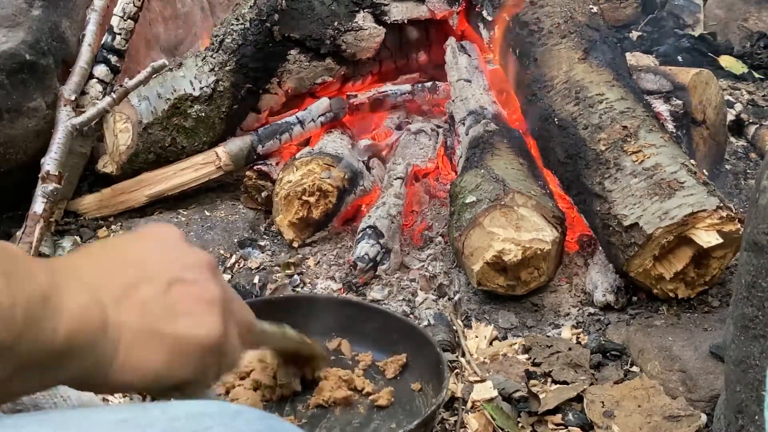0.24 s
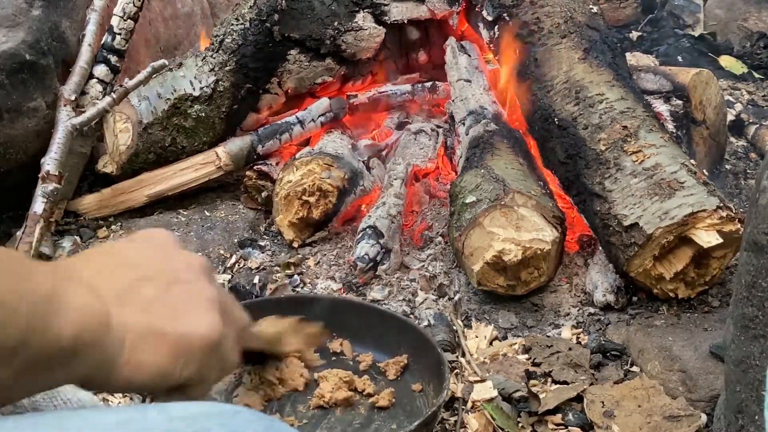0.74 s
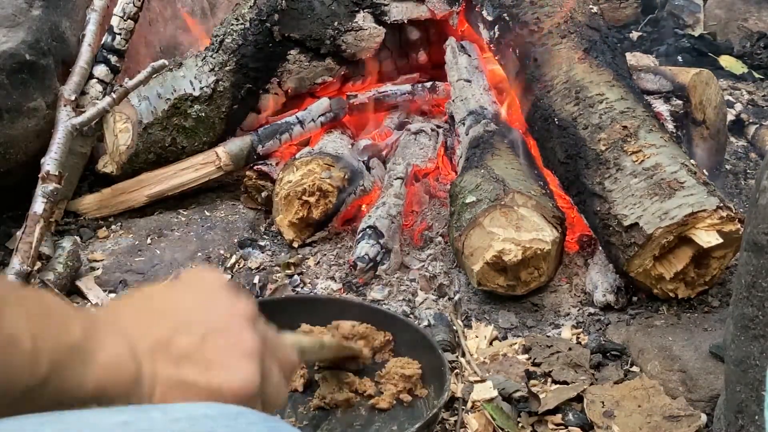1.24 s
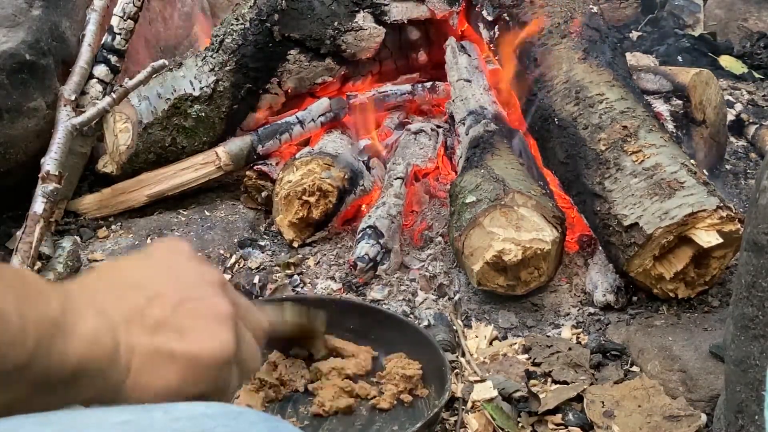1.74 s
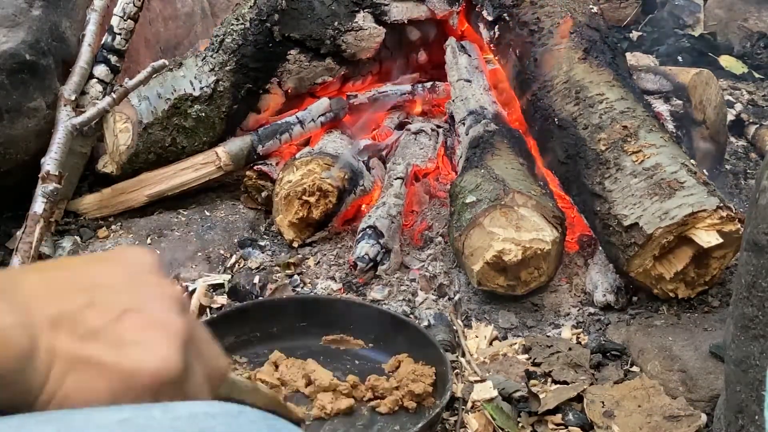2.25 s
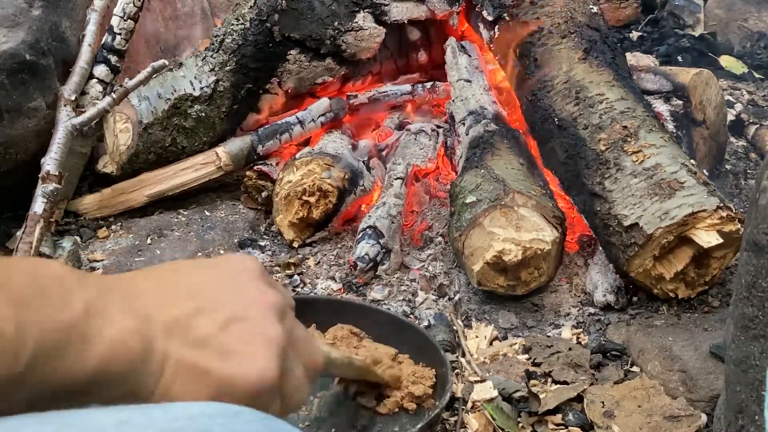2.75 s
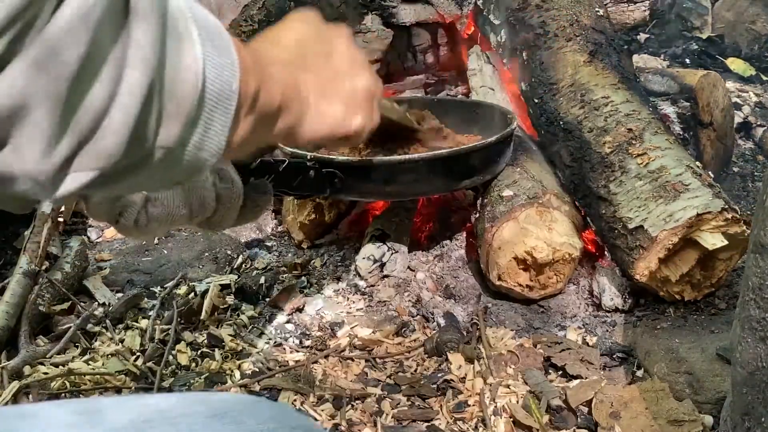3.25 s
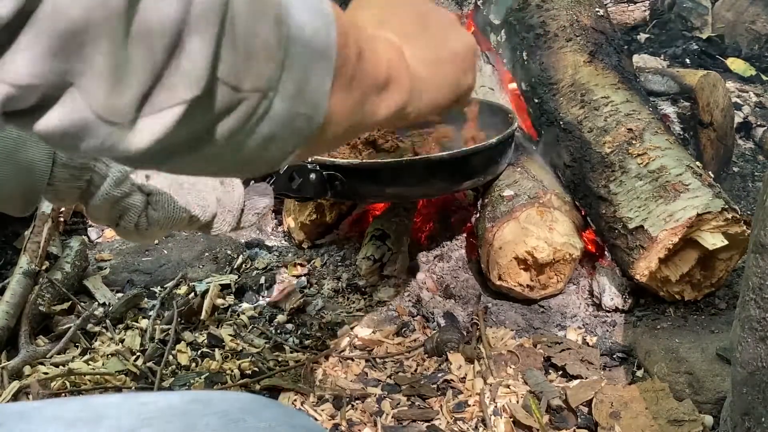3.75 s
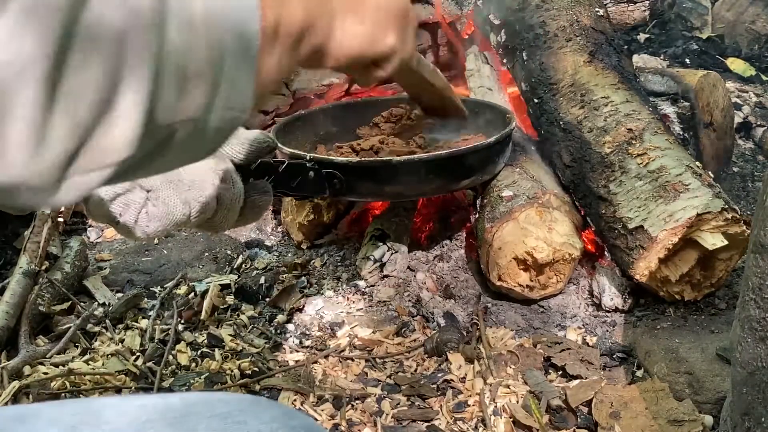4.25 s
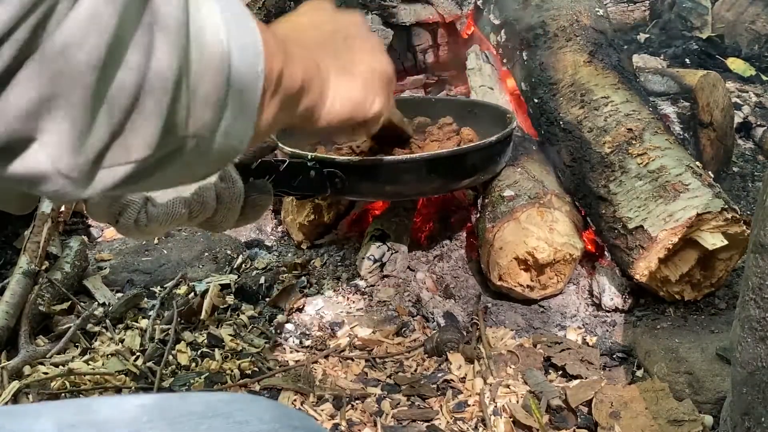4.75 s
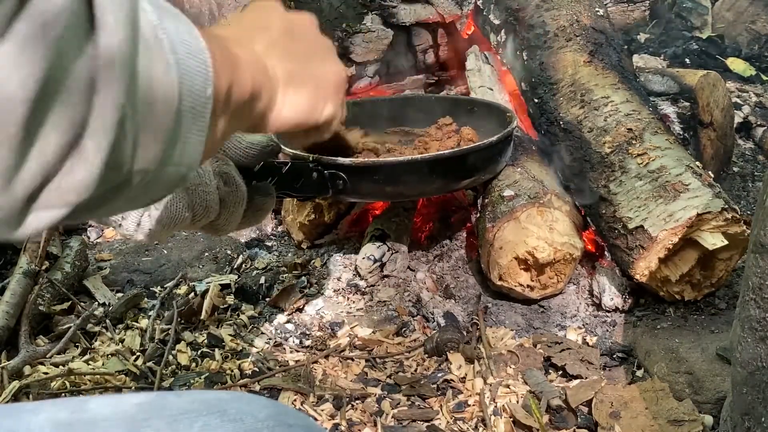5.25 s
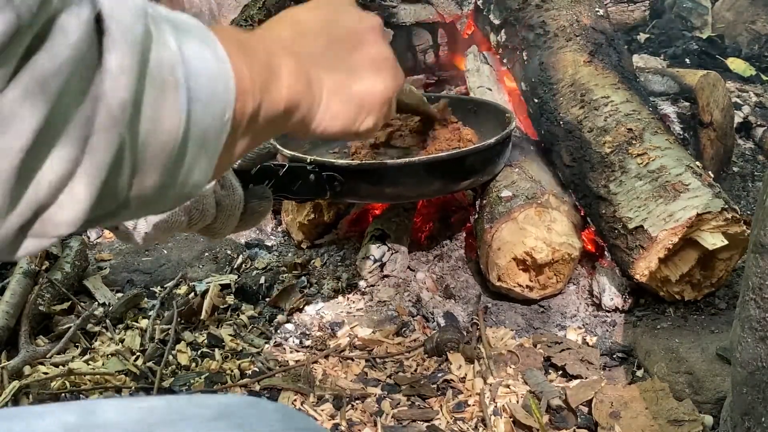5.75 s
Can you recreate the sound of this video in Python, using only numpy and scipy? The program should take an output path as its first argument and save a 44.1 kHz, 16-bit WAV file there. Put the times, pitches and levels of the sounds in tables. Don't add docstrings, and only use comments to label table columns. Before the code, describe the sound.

Wood taps and rubs on a small iron pan: sparse, short, hollow knocks, some with a hard clacking edge, each followed by a brief hiss or rasp and a squeaky low song of metal. Halfway through the pan is lifted, its tone shifts, and firm knocks follow every third of a second or so. Near microphone, open air, dry, with a quiet fire and woods far below.

```python
import sys
import numpy as np
from scipy import signal
from scipy.fft import rfft, irfft, next_fast_len
from scipy.io import wavfile

SR = 44100
rng = np.random.default_rng(int(sys.argv[2]) if len(sys.argv) > 2 else 0)


def unload_audio(sound):
    columns = np.transpose(np.atleast_2d(sound))
    steps = np.round(np.clip(columns, -1, 1) * 32767)
    wavfile.write(sys.argv[1], SR, steps.astype(np.int16))


def nominal_scale(level):
    x = np.asarray(level, float) / 20
    return 10 ** x


N = 265261
LIFT_S = 3.14

# start in seconds, body level in dB, body mode in Hz, low-mode level in dB, low mode in Hz.
KNOCKS_RESTING = [(0.174, -29, 806, -52, 514), (0.41, -28, 558, -58, 540), (0.4128, -33, 1150, -29.5, 273),
                  (0.73, -47, 1280, -26, 338), (0.726, -37, 594, -66, 506), (0.742, -58, 1040, -32, 270),
                  (0.761, -42, 594, -42, 352), (0.782, -45.5, 744, -45, 265), (0.827, -55, 1640, -70, 300),
                  (0.844, -47, 1210, -54.5, 286), (1.058, -39, 1050, -24, 300),
                  (1.603, -39, 1064, -33.5, 432), (1.864, -27, 796, -27, 592), (1.916, -44, 541, -54, 517),
                  (2.331, -36, 587, -59, 466), (2.718, -21, 845, -36, 493), (2.723, -19, 1230, -22.5, 478)]
# start in seconds, body level in dB, body mode in Hz, low-mode level in dB, thud level in dB.
KNOCKS_HELD = [(3.348, -36.5, 620, -56.5, -64), (3.353, -38, 603, -59, -38), (3.394, -37, 600, -39, -77),
               (3.593, -42.5, 720, -57, -33), (3.607, -48, 654, -44, -36), (3.626, -60, 500, -60, -36),
               (3.651, -45.5, 503, -40, -56), (4.0135, -26.5, 690, -47.5, -26), (4.021, -27, 760, -27, -27),
               (4.123, -80, 505, -49, -60), (4.161, -65, 520, -52, -66), (4.191, -73, 493, -55, -64),
               (4.415, -20.5, 660, -26.5, -64), (4.421, -25.5, 666, -23.5, -24.5),
               (4.722, -33, 642, -45, -53), (4.859, -51, 530, -36, -73), (5.061, -34, 720, -55, -33),
               (5.0695, -26, 800, -21.5, -30), (5.071, -42, 630, -59, -23), (5.123, -67, 597, -37, -66),
               (5.349, -21.5, 742, -58, -20.5), (5.682, -16, 790, -15, -22), (5.694, -17.5, 700, -23, -29),
               (5.95, -56, 750, -61, -43)]
GROUND_THUD_DB, HELD_LOW_HZ = -20, 359
# frequency in Hz, level in dB, 60 dB decay time in seconds.
THUD_MODES = [(63, -3, 0.059), (122, 4.5, 0.061), (174, 3.5, 0.095)]
THUD_LAG_S = 0.0035
LUCK_DB = 1.5
CONTACT_CYCLES, SOFTER_PER_DB = 0.48, 0.012

# start in seconds, frequency in Hz, peak level in dB, ring time in ms.
SPOT_MODES = [(0.174, 1055, -44, 10), (0.174, 624, -35, 8.3), (0.175, 218, -53.5, 19),
              (0.411, 588, -17.5, 6.9), (1.057, 1080, -28.5, 5.4), (2.7185, 845, -15, 6.4),
              (2.72, 1205, -24, 9.5), (4.014, 1070, -40, 9), (5.0693, 671, -28, 14),
              (2.7175, 2450, -30.5, 6.3), (0.411, 1150, -18.5, 9.4), (0.411, 930, -24.5, 12.4),
              (0.411, 1595, -30, 6.8), (5.349, 833, -24, 11.5), (5.682, 790, -15.5, 9),
              (0.411, 790, -20, 8.1), (0.411, 1976, -29.5, 8.1), (0.411, 2230, -39, 6),
              (0.411, 3160, -37, 5.4), (0.411, 3540, -42, 5.7), (0.411, 3810, -40.5, 5),
              (0.7305, 1265, -32, 4.5), (0.7305, 1780, -39, 5.4), (0.7305, 3900, -54, 4.6),
              (1.057, 1730, -41, 8), (1.057, 2790, -44.5, 6.5), (2.7175, 2200, -32, 5),
              (2.7175, 3800, -27, 3), (4.0135, 485, -33, 11.8), (4.014, 2120, -45, 5.7),
              (4.416, 860, -24.5, 9.7), (4.416, 477, -21, 6.7), (4.4155, 1150, -43, 6.8),
              (4.415, 3800, -44, 11), (4.415, 2290, -32.5, 4), (5.069, 2066, -52, 7.1),
              (5.069, 3740, -55, 13), (5.069, 2830, -52, 5), (5.349, 1440, -43, 11),
              (5.682, 1255, -32.5, 12), (5.682, 1425, -31.5, 10), (5.682, 1947, -25.5, 5.1),
              (5.682, 3375, -45, 6.6), (5.682, 4400, -31, 4.5), (0.4105, 400, -32, 8), (1.057, 520, -43, 7),
              (2.7175, 362, -35, 12), (5.0695, 805, -28.5, 11), (5.681, 560, -27, 6)]
# start in seconds, frequency in Hz, peak level in dB, ring time in ms.
CATCHES = [(0.473, 1600, -51, 6), (0.554, 1690, -52, 7), (1.25, 126, -60, 25), (1.6, 182, -50, 15.5),
           (2.418, 4000, -56, 14), (2.438, 2980, -47, 12), (2.493, 240, -56, 10.6), (4.483, 2670, -50, 13),
           (4.522, 2980, -49, 7), (5.061, 704, -34.5, 5.9), (5.403, 4130, -48, 15),
           (5.49, 1690, -48.5, 10.5), (0.757, 2400, -48, 8), (0.827, 2600, -48, 4),
           (0.844, 1710, -46.5, 5.7), (2.366, 2180, -48, 9.9), (2.374, 2370, -49.5, 9.9),
           (2.38, 790, -44.5, 11), (2.393, 880, -42, 3.6), (2.402, 780, -36.5, 7.3), (2.408, 740, -38, 7.2),
           (2.426, 985, -40, 7.2), (2.435, 1140, -42, 6.2), (2.446, 1100, -28, 3), (2.452, 954, -28.5, 7.1),
           (2.452, 1510, -29, 3.4), (2.457, 1880, -34.5, 6.4), (2.466, 956, -29, 6),
           (2.497, 4420, -44, 6.3), (2.752, 2560, -44, 12), (2.767, 890, -32, 4.3), (2.781, 955, -36, 6.8),
           (2.794, 897, -32, 5.4), (2.8, 905, -36, 6), (2.813, 1100, -49, 11), (4.459, 1708, -44.5, 15),
           (4.469, 1750, -50, 6), (4.492, 764, -40, 6.2), (4.5, 810, -47, 5.5), (4.5, 2960, -43.5, 9.2),
           (4.519, 780, -45, 8.2), (4.546, 1750, -46, 5), (4.553, 1706, -39, 4), (5.725, 813, -42, 7.6),
           (5.734, 847, -36, 18), (5.735, 1670, -45, 3.5), (5.742, 1700, -43, 4), (5.751, 806, -32.5, 12),
           (5.784, 1670, -49.5, 5.7)]
# start in seconds, frequency in Hz, peak level in dB, ring time in ms.
BRUSHES = [(0.394, 650, -46, 11), (0.795, 700, -55, 10), (0.8, 300, -54, 12), (4.03, 690, -42, 12),
           (2.566, 910, -54.5, 9.2), (2.709, 790, -42, 10), (3.045, 3100, -56, 11), (3.045, 1110, -57, 11),
           (3.16, 1650, -61, 17), (3.48, 1710, -59, 18), (3.69, 2280, -59, 9.1), (3.75, 1750, -54, 14),
           (3.955, 1750, -59, 16), (4.006, 700, -48, 9), (4.404, 600, -45, 14), (1.12, 4300, -57, 9),
           (1.175, 4600, -57, 8), (1.18, 2600, -51, 10), (1.195, 3300, -51, 8), (1.175, 7000, -62, 18)]
BLOW_RISE_MS, CATCH_RISE_MS, BRUSH_RISE_MS = 0.4, 1.23, 5
PARTNER_RATIO = 1.5
BLOW_PARTNER_DB, CATCH_PARTNER_DB, BRUSH_PARTNER_DB = -22.5, -14, -7

# start in seconds, first-mode level in dB,
# first mode in Hz, level of the second pair in dB, level of the top modes in dB.
RINGS = [(0.172, -49, 1710, -54, -54), (0.2485, -64, 1710, -63, -62), (0.4105, -46, 1590, -45.5, -48.5),
         (0.7304, -38, 1460, -39.5, -69), (0.724, -49, 1890, -50, -73), (0.742, -50, 1300, -45, -68),
         (0.76, -55, 1500, -53, -65), (1.057, -42, 1850, -51, -42), (1.6028, -57, 1860, -58, -53),
         (1.844, -57, 1080, -56, -63), (1.8657, -48.5, 1590, -49.5, -57), (2.1382, -68, 1350, -70, -46.5),
         (2.3298, -45.5, 1090, -56, -61), (2.7175, -29, 1634, -26.5, -21.5), (3.594, -64, 1900, -56, -53),
         (4.014, -38, 1720, -62, -44), (4.4155, -28.5, 1702, -33, -50), (4.7218, -57, 1170, -67, -72),
         (4.7978, -68, 1570, -73, -46), (5.07, -48, 1640, -65, -55.5), (5.3488, -37, 1660, -67, -62),
         (5.5372, -61, 1830, -75.5, -46), (5.682, -17.5, 1644, -23.5, -41.5), (5.691, -32, 1615, -43, -52)]
# frequency in Hz, level in dB, 60 dB decay time in seconds.
PAIR_RESTING = [(2120, -5, 0.03), (2450, -5, 0.026)]
# frequency in Hz, level in dB, 60 dB decay time in seconds.
PAIR_HELD = [(1916, 0.5, 0.022), (2070, -1.5, 0.02)]
# frequency in Hz, level in dB, 60 dB decay time in seconds.
TOP_RESTING = [(3170, -1, .022), (3690, 0, .022), (4390, -2, .022)]
# frequency in Hz, level in dB, 60 dB decay time in seconds.
TOP_HELD = [(3100, -6, .018), (3750, -2, .018), (4450, 0, .018)]

# start in seconds, peak level in dB, lower band edge in Hz, upper band edge in Hz.
SNAPS = [(0.1745, -47, 503, 1500), (0.2497, -34, 1520, 4160), (0.7315, -34, 1015, 2800),
         (0.412, -41, 3900, 4700), (1.2223, -40, 1500, 15500), (1.865, -40, 1000, 2000),
         (2.718, -36, 4900, 6200), (5.0712, -37, 1350, 1950), (1.845, -46, 3030, 12000),
         (2.138, -42, 2510, 9000), (2.33, -41, 1000, 3530), (2.7191, -22.5, 1490, 6500),
         (3.5926, -40, 990, 5000), (4.4145, -30, 1210, 4970), (4.7225, -43.5, 800, 1500),
         (5.056, -42, 1005, 5000), (5.0705, -46, 900, 2300), (5.538, -36.5, 790, 5500)]

# start in seconds, length in seconds,
# hiss level in dB, pan song level in dB, climb in dB from start to end.
STROKES = [(0.0, 0.13, -69.5, -65, -11.5), (0.181, 0.15, -67.5, -69.5, 0.5),
           (0.422, .05, -66.5, -68.5, 4.5), (0.488, 0.066, -53, -61, 0),
           (0.733, 0.15, -58, -59, -3), (0.9, 0.23, -74, -95, -3), (1.069, 0.09, -69, -82, 8),
           (1.162, .045, -62, -76, 2), (1.329, 0.19, -70, -71.5, -8), (1.561, 0.22, -67.5, -71, 1),
           (1.863, 0.13, -64.5, -73, -10), (1.976, 0.61, -70.5, -71.5, -5),
           (2.362, 0.093, -60, -51.5, 3.5), (2.435, 0.049, -49.5, -43, 2),
           (2.484, 0.045, -66.5, -63.5, 3), (2.736, 0.094, -55, -40.5, -14.5),
           (2.837, 0.2, -74, -78, -4), (3.021, 0.084, -69, -67, 6),
           (3.14, 0.068, -63, -61.5, -3), (3.329, 0.16, -66.5, -88, 5), (3.6, 0.16, -64.5, -78, 2.5),
                (3.91, 0.12, -64, -60.5, 8), (4.04, 0.21, -65.5, -63, 4.5), (4.434, 0.14, -56, -44, -6),
                (4.72, 0.22, -68.5, -96, -2), (5.054, 0.17, -67.5, -77, -7), (5.359, 0.15, -57, -59, 1),
                (5.701, 0.082, -53.5, -41, 1.5), (5.931, 0.061, -74.5, -70, 9.5)]
SAG_DB, SONG_SAG_DB = 6, 10.5
RISE_DB_PER_S, FALL_DB_PER_S = 711.5, 426
SETTLE_DB, SETTLE_DB_PER_S = -20.5, 89.5
SURGE_FOLLOWS = 0.54
SURGE_RISE_DB_PER_S, SURGE_FALL_DB_PER_S = 895.5, 259

# frequency in Hz, width in Hz, level in dB.
SONG_RESTING = [(590, 57, -2), (845, 180, 8.5), (1004, 210, 18.5), (1150, 500, 1.5)]
# frequency in Hz, width in Hz, level in dB.
SONG_HELD = [(620, 120, -16), (805, 55, 0), (1000, 100, -16), (1180, 130, -9), (1740, 120, -3.5)]
# frequency in Hz, width in Hz, level in dB.
RASP_RESTING = [(1600, 370, -5), (2370, 410, -3.5), (2740, 680, -3.5), (3140, 510, -4), (3600, 960, -6),
                (4400, 1360, -8)]
# frequency in Hz, width in Hz, level in dB.
RASP_HELD = [(1720, 280, -6), (2200, 350, -9), (2650, 300, -9), (3000, 300, -7), (3600, 500, -11),
             (4500, 700, -12)]
# frequency in Hz, level in dB per Hz.
HISS_SPECTRUM = [(4000, -11.5), (5500, -2), (7500, -1.5), (10000, 2.5), (13000, -1.5), (15750, -5)]
FINE_STICK, JUDDER_STICK = 1.2, 2.5
HISS_PATCHY_DB, CLUMP_DB = 2.6, 2.2
RASP_RESTING_DB, RASP_HELD_DB, RUB_HELD_DB = 1.2, -3, -12.5
RUB_SONG_DB, RASP_SONG_DB = -26, -24
SURGE_RUB_DB, SURGE_SONG_DB = -24, -37

# start in seconds, peak level in dB.
TICKS = [(0.175, -33), (0.25, -47), (0.411, -28.5), (0.4932, -46), (0.7293, -41), (1.058, -42),
         (1.2222, -50), (1.251, -47.5), (1.6003, -47), (1.844, -40.5), (1.868, -38.5), (2.023, -41.5),
         (2.1386, -38.5), (2.328, -48), (2.5716, -48), (2.694, -50), (2.7176, -28), (3.3897, -46),
         (3.5929, -33.5), (4.377, -54), (4.415, -27.5), (4.59, -40.5), (4.7967, -42.5), (5.055, -46),
         (5.0684, -39.5), (5.3457, -53), (5.5357, -42.5), (5.674, -44), (5.6822, -27), (5.9447, -47.5)]
TICK_MS = 1.7
# time in seconds, level in dB.
RUMBLE_COURSE = [(0.0, -71), (0.23, -77), (0.4, -78.5), (2.36, -70), (2.53, -78.5), (3.15, -74.5),
                 (3.51, -67.5), (4.35, -74.5), (5.29, -69), (5.72, -78.5), (5.89, -73), (6.01, -67.5)]
# frequency in Hz, level in dB per Hz.
WOODS_SPECTRUM = [(88, -28), (150, -33.5), (363, -1.5), (761, 1.5), (969, -1), (1730, -1.5), (4530, -8),
                  (5500, -17.5), (7000, -16.5), (9100, -15.5), (15400, -120)]
WOODS_DB = -68.5

# frequency in Hz, left minus right in dB, lead of the left port in radians.
PORTS_RESTING = [(140, 2, .1), (300, 1, .35), (430, -1, .7), (600, .7, -.05), (820, -.5, .5),
                 (1120, 3.5, .65), (2400, 3, 1.0), (6500, 2, 2.45)]
# frequency in Hz, left minus right in dB, lead of the left port in radians.
PORTS_HELD = [(140, 2, .15), (260, 2, .5), (350, 4, .3), (490, -1.5, -.7), (640, -3, .15), (1050, 1, .35),
              (1700, .7, .05), (6500, 1.2, 2.45)]
MONO_HZ = 6300
IN_STEP_HZ, TURN_HZ, TURN_BEND = 7150, 4050, 0.04
CUTOFF_HZ = 16600


def blows():
    resting = [(s, db, hz, db + GROUND_THUD_DB, low_db, low_hz) for s, db, hz, low_db, low_hz in KNOCKS_RESTING]
    held = [(s, db, hz, thud_db, low_db, HELD_LOW_HZ) for s, db, hz, low_db, thud_db in KNOCKS_HELD]
    return resting + held


def knocks():
    out, t = np.zeros(N), np.arange(SR // 4) / SR
    luck = rng.standard_normal((len(blows()), 12))
    for (s, body_db, hz, thud_db, low_db, low_hz), u in zip(blows(), luck):
        below_db, lowest_db, octave_db = (-8, -9, -26) if s < LIFT_S else (-13, -15, -24)
        body_modes = [(hz, 0, 0.05), (0.76 * hz, below_db, 0.06),
                      (0.65 * hz, lowest_db, 0.05), (2.0 * hz, octave_db, 0.04)]
        low_modes = [(low_hz, 0, 0.07), (0.85 * low_hz, -9, 0.07), (1.5 * low_hz, -7, 0.06)]
        contact_s = (CONTACT_CYCLES - SOFTER_PER_DB * (body_db + 15.0)) / hz
        body = struck(push(t, contact_s), body_modes, LUCK_DB * u)
        low = struck(push(t, 0.22 / low_hz), low_modes, LUCK_DB * u[4:])
        thud = struck(push(t - THUD_LAG_S, 0.00033), THUD_MODES, 3 * u[8:])
        sound = nominal_scale(body_db + 0.5) * body * smother(t, 0.007)
        sound += nominal_scale(low_db - 7) * low * smother(t, 0.019)
        sound += nominal_scale(thud_db - 9.0) * thud * smother(t, 0.017)
        add(out, sound, s)
    return out


def lone_modes(rows, rise_ms, partner_db):
    out, t = np.zeros(N), np.arange(SR // 12) / SR
    for s, hz, db, ring_ms in rows:
        tone = np.sin(2 * np.pi * hz * t)
        tone += nominal_scale(partner_db) * np.sin(2 * np.pi * PARTNER_RATIO * hz * t)
        swell = 1 - np.exp(-1000 * t / rise_ms)
        decay = np.exp(-(1000 * t / ring_ms) ** 2)
        add(out, nominal_scale(db - 0.5) * tone * swell * decay, s)
    return out


def rings():
    out, t = np.zeros(N), np.arange(SR // 8) / SR
    luck = rng.standard_normal((len(RINGS), 3))
    chatter = rng.standard_normal((len(RINGS), SR // 8))
    for (s, first_db, first_hz, second_db, top_db), u, noise in zip(RINGS, luck, chatter):
        resting = s < LIFT_S
        edge = push(t, 0.0001) + 0.077 * noise * np.exp(-t / 0.032)
        first_modes = [(first_hz, 0, 0.07), (0.68 * first_hz, -11, 0.05)]
        sound = nominal_scale(first_db + 4.5) * struck(edge, first_modes, u)
        sound += nominal_scale(second_db + 4.0) * struck(edge, PAIR_RESTING if resting else PAIR_HELD, u[1:])
        sound += nominal_scale(top_db + 1.0) * struck(edge, TOP_RESTING if resting else TOP_HELD, 2 * u)
        add(out, sound * smother(t, 0.012), s)
    return out


def snaps():
    out, t = np.zeros(N), np.arange(SR // 50) / SR
    for s, db, low_hz, high_hz in SNAPS:
        band = signal.butter(2, [low_hz, high_hz], "band", fs=SR, output="sos")
        click = signal.sosfilt(band, push(t, 0.00008) - 0.34 * push(t - 0.0011, 0.000097))
        add(out, nominal_scale(db) * click / np.max(np.abs(click)), s)
    return out


def strokes():
    t, hiss, song, surge = np.arange(N) / SR, nominal_scale(-110), nominal_scale(-110), nominal_scale(-110)
    for s, long_s, hiss_db, song_db, climb_db in STROKES:
        along = np.clip(2 * (t - s) / long_s - 1, -1, 1)
        after = np.clip(t - s - long_s, 0, 1)
        fall_db = np.minimum(FALL_DB_PER_S * after, SETTLE_DB_PER_S * after - SETTLE_DB)
        rise_db = RISE_DB_PER_S * np.clip(s - t, 0, 1)
        shape_db = climb_db * along / 2 - rise_db - fall_db
        hiss = hiss + nominal_scale(hiss_db + shape_db - SAG_DB * along ** 2)
        song = song + nominal_scale(song_db + shape_db - SONG_SAG_DB * along ** 2)
    for s, body_db, _, _, low_db, _ in blows():
        before_db = SURGE_RISE_DB_PER_S * np.clip(s - t, 0, 1)
        after_db = SURGE_FALL_DB_PER_S * np.clip(t - s, 0, 1)
        peak_db = SURGE_FOLLOWS * (max(body_db, low_db) + 30.0) - 28.5
        surge = np.maximum(surge, nominal_scale(peak_db - before_db - after_db))
    return hiss, song, surge


def scrape():
    slide, singing, surge = strokes()
    held = np.arange(N) > LIFT_S * SR
    stick_db = drift(17)
    fine = grit(15000, 1.6) * nominal_scale(FINE_STICK * stick_db)
    coarse = grit(2200, 2.3) * nominal_scale(1.2 * stick_db)
    judder = grit(1500, 1.1) * nominal_scale(JUDDER_STICK * stick_db)

    hiss_bands_hz = np.geomspace(3600, 17000, num=8)
    hiss = slide * nominal_scale(4.5) * patchy(coloured(fine, HISS_SPECTRUM), hiss_bands_hz, HISS_PATCHY_DB)

    rasp_held = nominal_scale(RASP_HELD_DB) * resonant(coarse, RASP_HELD, CLUMP_DB)
    rasp_resting = nominal_scale(RASP_RESTING_DB) * resonant(coarse, RASP_RESTING, CLUMP_DB)
    rasp_gain = slide + nominal_scale(RASP_SONG_DB) * singing
    rasp = rasp_gain * nominal_scale(2.0) * np.where(held, rasp_held, rasp_resting)

    hurry_db = np.clip(4 * (20 * np.log10(slide) + 50), -22, 22)
    song_held = resonant(judder, SONG_HELD, CLUMP_DB)
    song_resting = resonant(judder, SONG_RESTING, CLUMP_DB, hurry_db)
    song_gain = singing + nominal_scale(SURGE_SONG_DB) * surge
    song = song_gain * nominal_scale(-4.0) * np.where(held, song_held, song_resting)

    rub_modes = [(146.8, 280, -2.5), (265.5, 220, 3.74), (338, 320, -1)]   # Hz, width Hz, dB
    rub_gain = nominal_scale(SURGE_RUB_DB) * surge + nominal_scale(RUB_HELD_DB) * slide * held + nominal_scale(RUB_SONG_DB) * singing
    rub = rub_gain * nominal_scale(-5.0) * resonant(judder, rub_modes, CLUMP_DB)
    return hiss + rasp + song + rub


def ticks():
    out, t = np.zeros(N), np.arange(SR // 40) / SR
    for (s, db), noise in zip(TICKS, rng.standard_normal((len(TICKS), SR // 40))):
        top_hz = np.clip(14992 - 450 * (db + 33.5), 7000, 15500)
        band = signal.butter(2, [2500, top_hz], "band", fs=SR, output="sos")
        burst = signal.sosfilt(band, noise * np.exp(-1000 * t / TICK_MS))
        add(out, nominal_scale(db + 1.0) * burst / np.max(np.abs(burst)), s)
    return out


def embers():
    spectrum = [(5000, -38), (7500, -4.5), (11000, 17.5), (15750, -1.5)]   # Hz, dB per Hz
    return nominal_scale(-84) * coloured(rng.standard_normal(N), spectrum)


def fire():
    spectrum = [(20, 1.0), (40, -4.0), (65, 2.5), (120, -8), (250, -9.0), (400, -23.5)]   # Hz, dB per Hz
    mid, side = coloured(rng.standard_normal((2, N)), spectrum)
    seconds, db = np.transpose(RUMBLE_COURSE)
    level_db = np.interp(np.arange(N) / SR, seconds, db)
    return nominal_scale(level_db + 3.0 * drift(9)) * (mid + 0.3 * side * [[1], [-1]])


def woods():
    gain = nominal_scale(WOODS_DB + 2.0 + 0.43 * drift(0.9))
    return gain * coloured(rng.standard_normal((2, N)), WOODS_SPECTRUM)


def push(t, long_s):
    return np.sin(np.pi * np.clip(t / long_s, 0, 1))


def struck(force, modes, luck_db):
    out, pitches = 0, [mode[0] for mode in modes]
    for (hz, db, t60), more_db in zip(modes, luck_db):
        r, w = nominal_scale(-60 / (t60 * SR)), 2 * np.pi * hz / SR
        out = out + nominal_scale(db + more_db) * signal.lfilter([1, -1], [1, -2 * r * np.cos(w), r * r], force)
    edges = [0.6 * min(pitches), 1.4 * max(pitches)]
    out = signal.sosfilt(signal.butter(2, edges, "band", fs=SR, output="sos"), out)
    return out / np.max(np.abs(out))


def smother(t, after_s):
    return 0.78 * np.exp(-(t / after_s) ** 2) + 0.14


def grit(per_s, spread_db):
    sizes = nominal_scale(spread_db * np.minimum(rng.exponential(1, N), 5)) * rng.choice([-1, 1], N)
    return rms_one(sizes * (rng.random(N) < per_s / SR))


def resonant(x, peaks, patchy_db, tilt_db=0):
    out = 0
    for k, (hz, width, db) in enumerate(peaks):
        r, w = np.exp(-np.pi * width / SR), 2 * np.pi * hz / SR
        fed = x * nominal_scale(db + patchy_db * drift(32) + tilt_db * np.log2(hz / 880))
        mode = signal.lfilter([1 - r * r, 0, r * r - 1], [1, -2 * r * np.cos(w), r * r], fed)
        out = out + (-1) ** k * mode
    return rms_one(out)


def patchy(x, edges_hz, patchy_db):
    out = 0
    for k, edges in enumerate(zip(edges_hz, edges_hz[1:])):
        band = signal.butter(2, edges, "band", fs=SR, output="sos")
        out = out + nominal_scale(patchy_db * drift(24)) * signal.sosfilt(band, x) * (-1) ** k
    return rms_one(out)


def coloured(x, points):
    hz, db = np.transpose(points)
    size = next_fast_len(N)
    axis = np.log(np.fft.rfftfreq(size, 1 / SR) + 1)
    gain = nominal_scale(np.interp(axis, np.log(hz), db, left=-80, right=-80))
    return rms_one(irfft(rfft(x, size) * gain, size)[..., :N])


def drift(rate):
    r = np.exp(-2 * np.pi * rate / SR)
    return rms_one(signal.lfilter([1], [1, -2 * r, r * r], rng.standard_normal(N + SR))[SR:])


def rms_one(x):
    return x / np.sqrt(np.mean(x ** 2) + 1e-20)


def add(out, sound, s):
    at = round(s * SR)
    out[..., at:at + sound.shape[-1]] += sound[..., :N - at]


def at_ports(x, points):
    hz, db, lead = np.transpose(points)
    size = next_fast_len(N + 4096)
    axis = np.log(np.fft.rfftfreq(size, 1 / SR) + 1)
    half = np.array([[0.5], [-0.5]])
    balance = nominal_scale(half * np.interp(axis, np.log(hz), db))
    phase = np.exp(1j * half * np.interp(axis, np.log(hz), lead))
    return irfft(rfft(x, size) * balance * phase, size)[:, :N]


def scene():
    near = knocks() + rings() + scrape() + ticks() + embers() + snaps()
    near = near + lone_modes(SPOT_MODES, BLOW_RISE_MS, BLOW_PARTNER_DB)
    near = near + lone_modes(CATCHES, CATCH_RISE_MS, CATCH_PARTNER_DB)
    near = near + lone_modes(BRUSHES, BRUSH_RISE_MS, BRUSH_PARTNER_DB)
    resting = np.arange(N) < LIFT_S * SR
    pan = np.where(resting, at_ports(near, PORTS_RESTING), at_ports(near, PORTS_HELD))
    return pan + fire() + woods()


def top_cut(x):
    return signal.sosfilt(signal.butter(12, 16950, fs=SR, output="sos"), x)


def record(dry):
    size = next_fast_len(N + 8192)
    hz, both = np.fft.rfftfreq(size, 1 / SR), rfft(dry, size)
    left_right = np.array([[-1], [1]])
    treble = 1 / (1 + (MONO_HZ / (hz + 1)) ** 24)
    turns = (hz - IN_STEP_HZ) / TURN_HZ
    turn = np.exp(1j * np.pi * (turns - TURN_BEND * turns ** 2) * left_right)
    late = np.exp(-2j * np.pi * 0.88 * (np.log(hz + 30) - hz / 20000))
    lean = nominal_scale(2.5 / (1 + (hz / 200) ** 2) * left_right)
    spread = both * lean * np.sqrt(1 - treble) + both[0] * turn * np.sqrt(treble)
    x = irfft(late * spread, size)[:, :N]
    x = signal.sosfilt(signal.butter(4, 50, "high", fs=SR, output="sos"), x)
    x = signal.sosfilt(signal.cheby2(12, 25, CUTOFF_HZ, fs=SR, output="sos"), x)
    return top_cut(x)


dry = scene()
out = record(dry)
unload_audio(out)
```